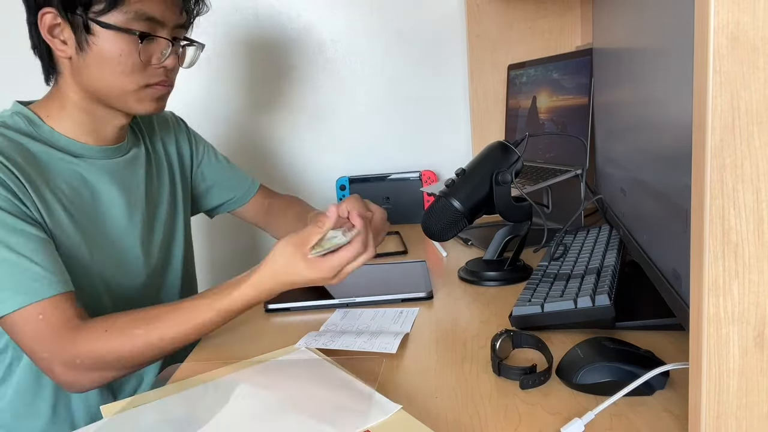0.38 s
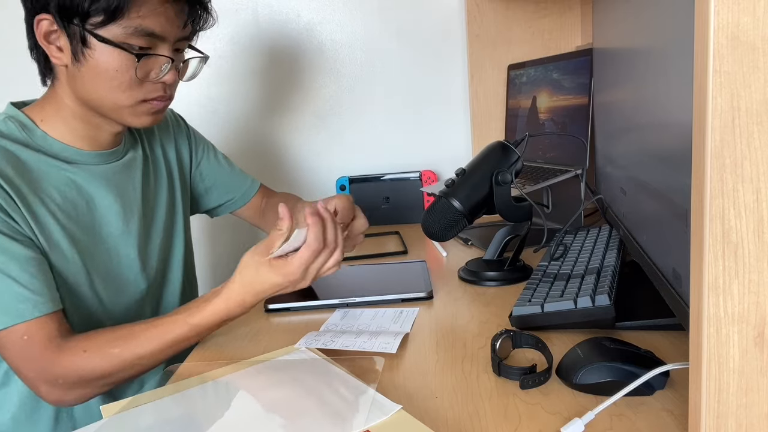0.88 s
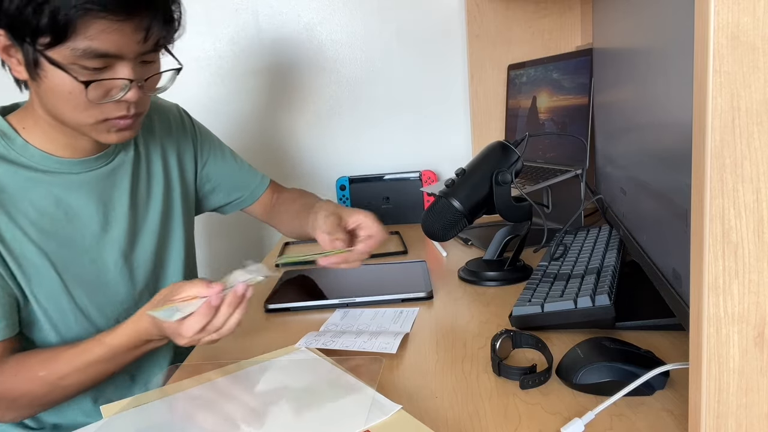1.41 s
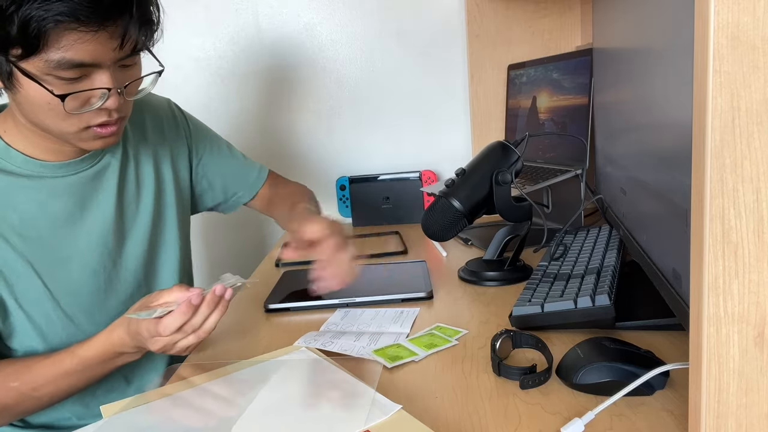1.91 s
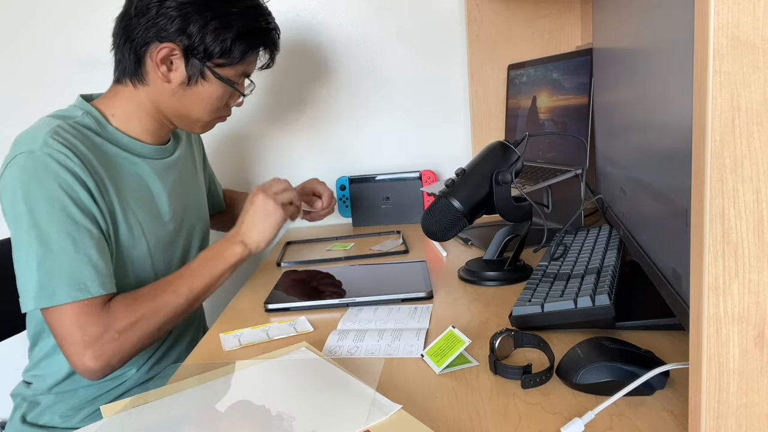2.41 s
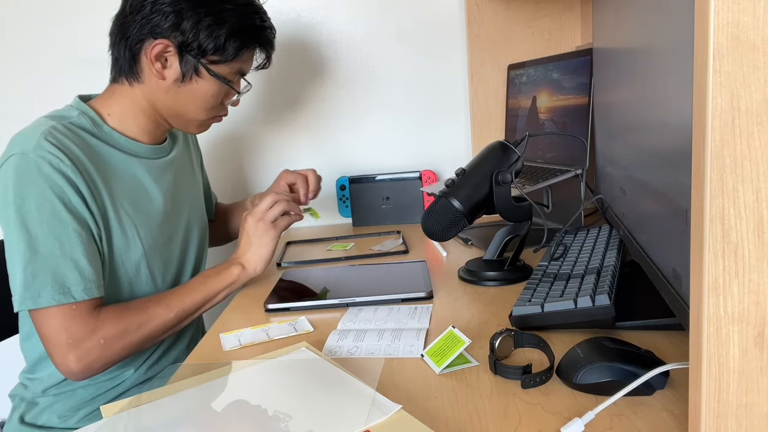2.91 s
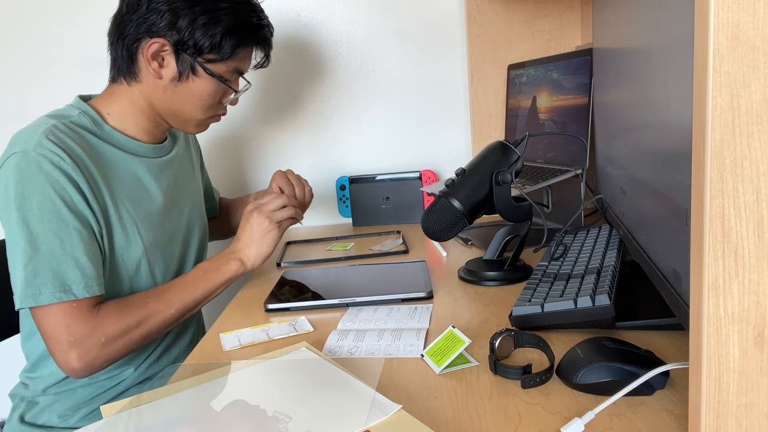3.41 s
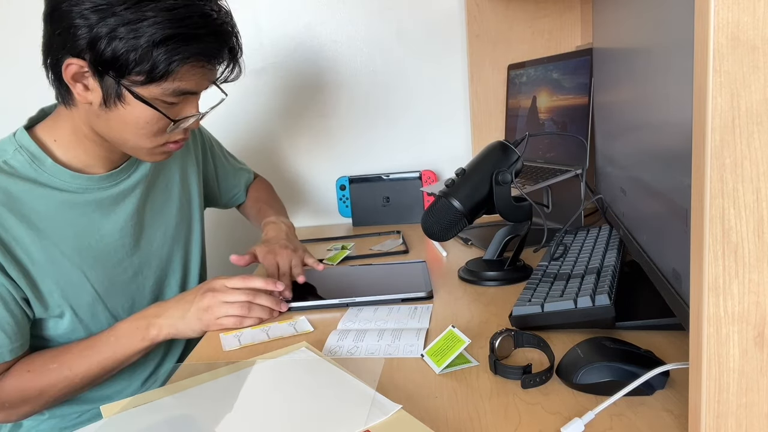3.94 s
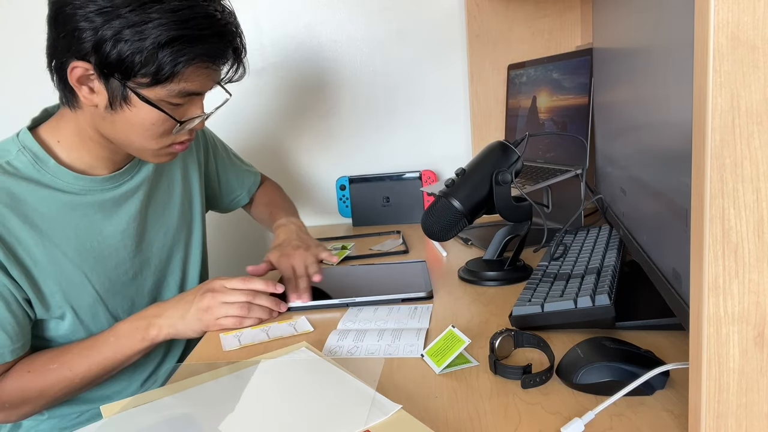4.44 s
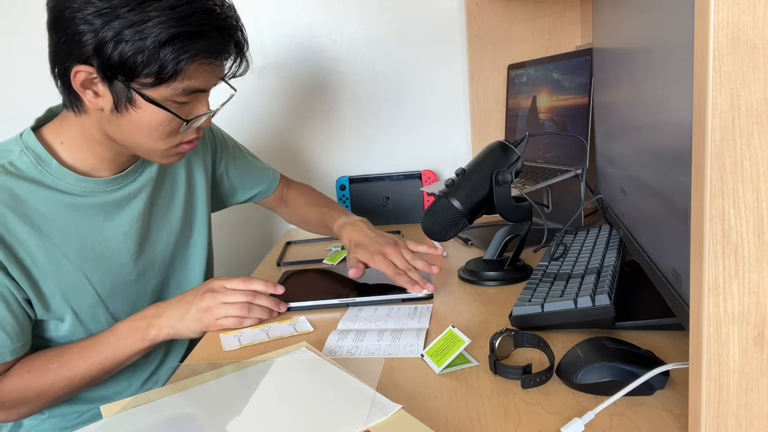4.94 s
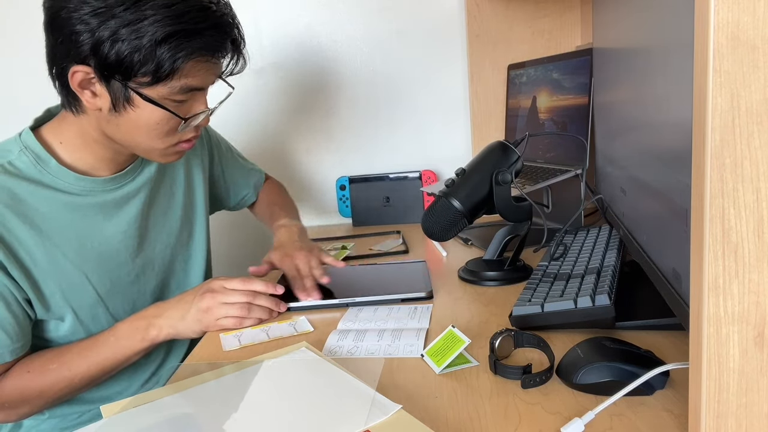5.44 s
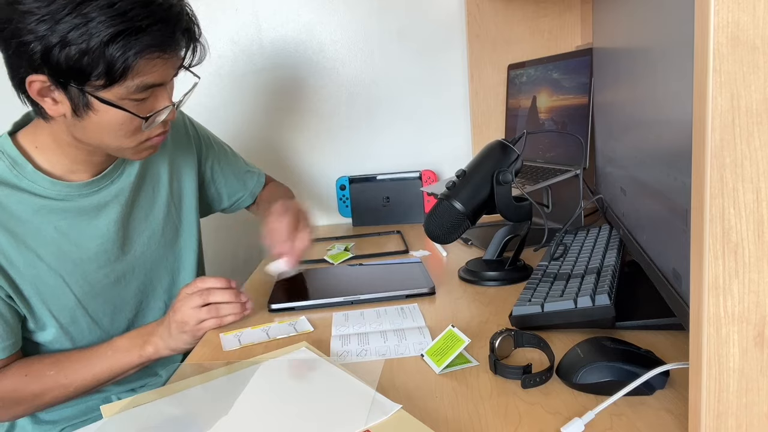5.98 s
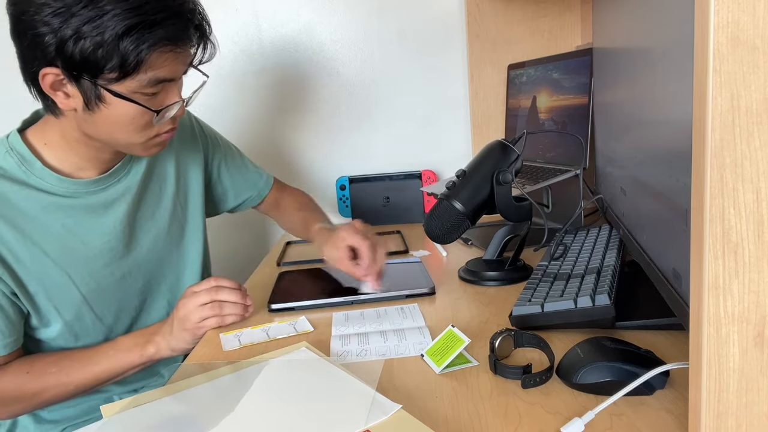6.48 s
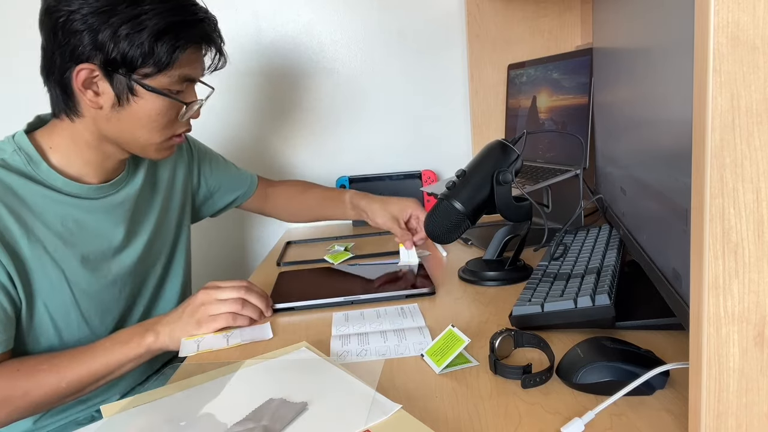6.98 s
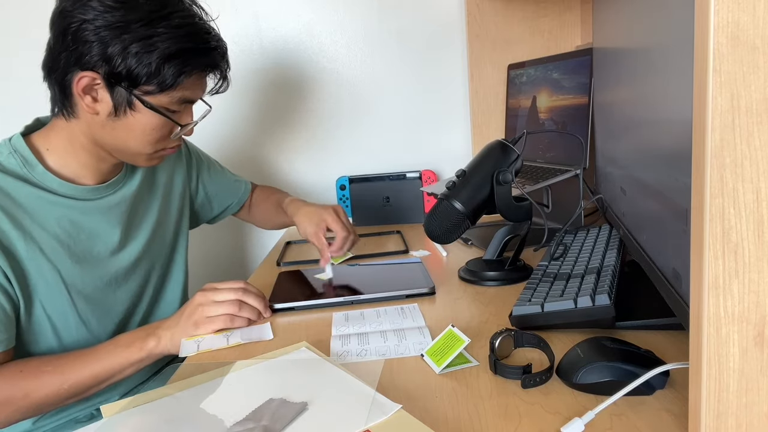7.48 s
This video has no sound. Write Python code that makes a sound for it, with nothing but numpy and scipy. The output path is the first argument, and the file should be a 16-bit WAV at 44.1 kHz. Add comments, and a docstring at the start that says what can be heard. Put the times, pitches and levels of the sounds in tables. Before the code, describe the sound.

A quiet small room with a steady low hum and faint hiss, heard from a microphone standing on a wooden desk. From 0 to 1.4 seconds fingers crinkle a small stiff wrapper: one bright snap near 0.1, scattered crackles, a cluster around 0.8, and a denser run at 1.1-1.3, with short hollow knocks. A softer shuffle and low bump come near 1.75, then a quick crisp rip at 2.2-2.3. Tiny crinkles thin out until 3.8. Near quiet follows, with very faint palm strokes on glass around 4.2-5.3. Cloth rubs from 5.6 to 6.8, with tiny sticky ticks and low desk sways. From 6.9 to 7.55 a sticky strip peels in fierce, dry, high-pitched crack bursts, separated by brief gaps and striking the tablet with low knocks. A dull low thump ends it near 7.6.

```python
"""A wooden desk in a quiet, small, humming room, heard by one microphone standing on the desk.
Hands crinkle and tear a small wrapper: filtered noise snaps over beds of tiny random slips, with hollow
ringing knocks. Palm and cloth wipe a tablet's glass with finer slips and a low drag of noise. A sticky strip
dabs it and peels off in bursts of sharp cracks over fine crackle that stops short; the cracks also strike
the tablet's resonances. Leaning hands and jolts shake the desk: low noise swells and short damped sines."""
import sys
import numpy as np
from scipy import signal
from scipy.fft import rfft, irfft, next_fast_len
from scipy.io import wavfile
from scipy.ndimage import uniform_filter1d

SR = 44100
rng = np.random.default_rng(int(sys.argv[2]) if len(sys.argv) > 2 else 0)


def generate_wav(signal):
    """Clip the signal to [-1, 1] and save it as 16-bit WAV at the path in sys.argv[1]."""
    frames = np.transpose(np.atleast_2d(signal))
    scaled = np.clip(frames, -1, 1) * 32767
    pcm = np.round(scaled).astype(np.int16)
    wavfile.write(sys.argv[1], SR, pcm)


def voltage_ratio(decibels):
    """Convert decibels (scalar or array-like) to amplitude ratios, 20 dB per decade."""
    exponent = np.asarray(decibels, float) / 20
    return 10 ** exponent


N = 335601  # length in samples

# the tablet jolted as the hand lands or the strip jumps free: t/s, level/dB, f/Hz
TABLET_JOLTS = [(1.762, -39, 122.5), (6.247, -39.5, 38), (6.93, -30, 110), (7.0505, -29, 140),
                (7.174, -26.5, 85), (7.319, -21, 80), (7.6068, -16, 170)]
CREST_DB = 7  # a snap's peak over the rms of its first moment


def unit(x):
    """Scales x to rms 1."""
    return x / np.sqrt(np.mean(x ** 2) + 1e-20)


def along(points, hz):
    """Reads a curve of (Hz, value) points on a log frequency axis."""
    f, value = np.transpose(points)
    return np.interp(np.log(hz + 1), np.log(f + 1), value)


def filtered(x, response):
    """Multiplies the spectrum of x by a response of frequency."""
    size = next_fast_len(N + SR // 2)
    return irfft(rfft(x, size) * response(np.fft.rfftfreq(size, 1 / SR)), size)[:N]


def resonance(f, hz, width):
    """Response of one causal damped mode: unity at its centre, width in Hz."""
    return 1j * f * width / (hz * hz - f * f + 1j * f * width)


def hiss(response):
    """Steady coloured noise of rms 1."""
    return unit(filtered(rng.standard_normal(N), response))


def swells(times, hold, db, slopes):
    """Gain of gestures that rise, hold and fall at slopes (up, down) in dB/s; overlaps add in power."""
    t = np.arange(0, N / SR + .002, .001)[:, None]
    rise_db = slopes[0] * np.maximum(times - t, 0)
    fall_db = slopes[1] * np.maximum(t - times - hold, 0)
    gain = np.sqrt(np.sum(voltage_ratio(db - rise_db - fall_db) ** 2, axis=1))
    return np.interp(np.arange(N) / SR, t[:, 0], gain)


def laid(times, rows):
    """Adds short sounds into the scene at their times."""
    at = np.round(times * SR).astype(int)[:, None] + np.arange(rows.shape[1])
    return np.bincount(at.ravel(), rows.ravel(), N + SR)[:N]


def crackle(rate, spread_db, t60, spectrum, patchy_db):
    """Random tiny slips (rate per second) of uneven size and drifting colour, each decaying over t60; rms 1."""
    slips = rng.random(N) < rate / SR
    sizes = slips * voltage_ratio(spread_db * np.minimum(rng.exponential(size=N), 3))
    decay = voltage_ratio(-60 * np.arange(SR // 50) / SR / t60)
    envelope = signal.fftconvolve(sizes, decay)[:N]
    z = signal.stft(envelope * rng.standard_normal(N), nperseg=256)[2]
    # random gains smoothed over frequency and time make the colour drift
    patches = uniform_filter1d(rng.standard_normal(z.shape), size=8, axis=0)
    patches = uniform_filter1d(patches, size=5, axis=1)
    patchy = signal.istft(z * voltage_ratio(patchy_db * unit(patches)), nperseg=256)[1][:N]
    return unit(filtered(patchy, lambda f: voltage_ratio(along(spectrum, f))))


def snaps(times, db, hz, breadth, shiver_db, shiver_t60, modes_db):
    """Each snap: a half-millisecond crack and a shiver of the sheet, in its own band with four chance modes."""
    t = np.arange(2048) / SR
    crack = np.exp(-((t - .0003) / .0003) ** 2)
    shiver = voltage_ratio(shiver_db - 60 * t / shiver_t60)
    burst = rng.standard_normal((len(times), len(t))) * (crack + shiver)
    f = np.fft.rfftfreq(2 * len(t), 1 / SR)
    modes = hz[:, None, None] * np.exp(.5 * rng.standard_normal((len(times), 4, 1)))
    colour = 1 + voltage_ratio(modes_db) * resonance(f, modes, .1 * modes).sum(axis=1)
    band = resonance(f, hz[:, None], breadth * hz[:, None]) ** 2
    burst = irfft(rfft(burst, 2 * len(t)) * band * colour)[:, :len(t)]
    onset_rms = np.sqrt(np.mean(burst[:, :32] ** 2, axis=1))
    return laid(times, burst * (voltage_ratio(db) / onset_rms)[:, None])


def room_hum():
    """The room's steady low hum: noise coloured by the room tone."""
    # room tone: f/Hz, relative level/dB
    room_tone = [(12, -41), (20, -2), (58, -1), (86, -4.5), (118, 1), (152, -9), (192, -10), (224, -18),
                 (252, -15.5), (293, -4.5), (364, -11), (452, -8.5), (500, -18), (841, -24), (1100, -38.5),
                 (1430, -57.5), (2420, -120)]
    return voltage_ratio(-56) * hiss(lambda f: voltage_ratio(along(room_tone, f)))


def wrapper():
    """Creases snap over a bed of small crinkles under squeezing fingers; dense slips make the rip."""
    # creases snapping: t/s, peak level/dB, centre f/Hz
    creases = [(0.0593, -35.5, 4700), (0.0643, -36, 7100), (0.0875, -14, 9640), (0.108, -29, 6700),
               (0.1205, -28.5, 7800), (.1961, -32.5, 9100), (0.207, -36.5, 5960), (.2902, -40, 3130),
               (.3748, -32, 5560), (0.3875, -39, 3930), (0.4066, -28.5, 8200), (.4157, -33, 9000),
               (0.4236, -34, 4670), (0.4306, -28, 8000), (0.519, -39.5, 2900), (.5777, -43, 3640),
               (0.6032, -35, 9500), (0.6153, -35.5, 6930), (0.6604, -27, 6900), (.6821, -54, 6500),
               (0.7138, -34.5, 4440), (0.7345, -30, 6600), (0.7611, -19.5, 8800), (0.773, -40, 6000),
               (0.7941, -20, 6840), (0.817, -34, 5500), (0.8432, -29.5, 3520), (.8649, -20.5, 10900),
               (0.8704, -29, 6340), (0.9824, -36, 2900), (1.0276, -41, 5170), (1.069, -27.5, 7600),
               (1.08, -30, 7940), (1.0876, -21.5, 5900), (1.1185, -15.5, 4630), (1.128, -34, 2470),
               (1.1522, -35, 4000), (1.1645, -27, 5270), (1.1825, -28, 5270), (1.19, -24, 5400),
               (1.2003, -24, 5000), (1.2159, -20, 6250), (1.2265, -36, 3145), (1.2476, -28, 7260),
               (1.2518, -18.5, 6960), (1.2617, -32, 4330), (1.2723, -27, 6100), (1.2896, -32.5, 6800),
               (1.3085, -36.5, 6300), (1.3287, -30.5, 6000), (1.3912, -30.5, 4700), (1.462, -31.5, 11500),
               (1.538, -40.5, 6000), (1.561, -45, 5200), (1.7325, -43, 4770), (1.7526, -36, 3640),
               (1.7577, -37, 3600), (1.7662, -32, 3540), (1.7703, -31, 2940), (1.808, -42, 3580),
               (1.8334, -31.5, 3400), (1.8609, -33, 4550), (2.0077, -34.5, 4260), (2.0462, -34.5, 3960),
               (2.069, -35, 6000), (2.089, -33, 5450), (2.1134, -37, 4030), (2.142, -49, 6000),
               (2.171, -48.5, 4000), (2.2011, -43, 4700), (2.207, -32.5, 5400), (2.232, -27.5, 6600),
               (2.2529, -16, 7500), (2.278, -23, 7100), (2.312, -25, 5000), (2.539, -51, 7000),
               (2.5915, -42, 3360), (2.6853, -34.5, 5400), (2.7655, -41, 8100), (2.8399, -32, 7000),
               (2.8534, -38, 5950), (2.8607, -38, 5800), (2.867, -36.5, 5800), (2.8917, -44, 8000),
               (3.1001, -56, 5300), (3.316, -55, 8100), (3.3205, -42, 8240), (3.5405, -48, 6270),
               (3.6161, -43, 7100), (3.8192, -52.5, 4170)]
    # fingers squeezing: t/s, hold/s, rustle level/dB
    squeezes = [(0.087, 0.038, -57.5), (0.17, 0.11, -57.5), (0.367, 0.063, -53), (0.595, 0.049, -59.5),
                (0.762, 0.055, -55), (0.874, 0.19, -57.5), (1.148, 0.099, -48), (1.298, 0.1, -57.5),
                (1.497, 0.38, -64.5), (1.738, 0.01, -55.5), (1.844, 0.076, -68), (1.996, 0.046, -65.5),
                (2.558, 0.048, -70), (2.685, 0.087, -69.5), (2.854, 0.013, -60), (3.022, 0.023, -67),
                (3.1, .18, -71.5), (3.307, 0.036, -65.5), (3.447, 0.018, -73), (3.543, .1, -68),
                (3.733, 0.02, -74.5)]
    # wrapper ripped open: t/s, hold/s, level/dB
    rips = [(2.2, .02, -50.5), (2.23, 0.016, -39.5), (2.252, 0.014, -32), (2.277, 0.015, -33.5),
            (2.301, 0.01, -34.5)]
    # colour of the crinkles: f/Hz, relative level/dB
    foil_colour = [(290, -36.5), (500, -3), (1110, -3.5), (1770, -3), (2160, -3), (3650, -2), (4210, -10.5),
                   (5310, -4.5), (8210, -5.5), (13300, -8), (16000, -23.5)]
    # colour of the rip: f/Hz, relative level/dB
    rip_colour = [(290, -36.5), (500, -20.5), (570, -12), (1050, -18), (2460, -8.5), (2890, -13.5),
                  (8090, -4.5), (13300, -16.5), (16000, -10.5)]

    s, db, hz = np.transpose(creases)
    snapping = snaps(s, db - CREST_DB, hz, 1.5, shiver_db=-8, shiver_t60=0.021, modes_db=-6.0)
    # once more off the desk below the hands, 2.4 ms later
    snapping += voltage_ratio(-7.5) * np.pad(snapping, (round(0.0024 * SR), 0))[:N]

    rustle = swells(*np.transpose(squeezes), (399.5, 247.5))
    rustle += swells(s, 0, db - 28.5, (5000, 500.5))  # crinkles die away after each crease
    bed = crackle(2600, 5.0, 0.005, foil_colour, patchy_db=5.0)

    s, hold, db = np.transpose(rips)
    tearing = swells(s, hold, db, (1500, 699.5))
    tearing += swells(s + hold, 0, db - 16.5, (5000, 150.5))  # the torn ends go on moving
    rip = crackle(3000, 2.2, .005, rip_colour, patchy_db=2.5)
    return snapping + rustle * bed + tearing * rip


def walls(x):
    """Desk, screen and walls answer with decaying noise tails; every third of a second meets a new tail."""
    # decay of the reflections: f/Hz, t60/s
    wall_decay = [(300, 0.086), (2000, 0.22), (7000, 0.11), (15000, 0.1)]
    out, step = np.zeros(N + SR), SR // 3
    for start in range(0, N, step):
        hz, t, z = signal.stft(rng.standard_normal(SR // 2), SR, nperseg=256)
        decay = voltage_ratio(-60 * t / along(wall_decay, hz)[:, None])
        tail = signal.istft(z * decay, SR, nperseg=256)[1]
        wet = signal.fftconvolve(x[start:start + step], tail / np.linalg.norm(tail))
        out[start + 100:][:len(wet)] += wet  # 100 samples of pre-delay
    return out[:N]


def pouch():
    """The pouch, knocked or flexed, rings hollow: a damped tone and a faint overtone, roughened by noise."""
    # knocks: t/s, level/dB, f/Hz
    knocks = [(0.203, -54, 455), (0.288, -43.5, 550), (0.387, -30, 526), (0.419, -34, 1013),
              (0.751, -41, 1170), (0.794, -30, 1750), (0.872, -35, 888), (0.947, -41.5, 2014),
              (1.117, -22.5, 1777), (1.129, -38, 1825), (1.191, -32.5, 1680), (1.214, -30.5, 2100),
              (1.388, -39.5, 800), (1.753, -37, 455), (1.763, -38.5, 1940), (1.819, -45, 1805),
              (2.044, -46, 465), (2.066, -40.5, 1870), (2.114, -48.5, 1620), (4.574, -46, 457),
              (6.433, -45, 616)]
    s, db, hz = np.transpose(knocks)[:, :, None]
    t = np.arange(SR // 10) / SR
    grain = rng.standard_normal((len(s), len(t)))
    rough = 1 + .9 * uniform_filter1d(grain, size=40, axis=1) * np.sqrt(40)
    ring = np.sin(2 * np.pi * hz * t) + 0.14 * np.sin(2 * np.pi * 1.46 * hz * t)
    envelope = voltage_ratio(db - 4.5 - 60 * t / 0.047) * (1 - np.exp(-t / .0004))
    return laid(s[:, 0], envelope * rough * ring)


def desk():
    """The top sways and thuds as low resonant noise, straight into the microphone's foot."""
    # the hand leaning on the desk: t/s, hold/s, sway level/dB
    leans = [(1.775, 0.046, -50), (5.647, 0.011, -45), (5.828, .05, -43.5), (6.27, .05, -44.5),
             (6.457, 0.14, -47.5), (6.725, 0.023, -43), (6.92, 0.23, -54), (7.206, .03, -37),
             (7.393, 0.065, -40.5), (7.514, 0.022, -53)]
    sway = swells(*np.transpose(leans), (179, 105.5))
    s, db, _ = np.transpose(TABLET_JOLTS)
    thud = voltage_ratio(-15) * sway + swells(s, 0, db - 14.5, (349.5, 308))
    rocking = hiss(lambda f: resonance(f, 41, 15) ** 2)
    thudding = hiss(lambda f: resonance(f, 100, 90) ** 2)
    return sway * rocking + thud * thudding


def jolts():
    """The jolted tablet swings and rebounds: a sine losing 13.2 dB a swing, gone within a few swings."""
    s, db, hz = np.transpose(TABLET_JOLTS)[:, :, None]
    swings = hz * np.arange(SR // 5) / SR
    return laid(s[:, 0], -voltage_ratio(db - 13.2 * swings) * np.sin(2 * np.pi * swings))


def wiping():
    """Fine slips make the palm hiss with a high sheen, then the cloth; skin drags lowest, as broad noise."""
    # strokes of the palm: t/s, hold/s, hiss level/dB, skin drag level/dB
    palm_strokes = [(4.244, 0.023, -93, -74), (4.508, 0.09, -70, -69), (4.63, 0.19, -72, -85),
                    (5.153, 0.2, -72.5, -83)]
    # strokes of the cloth: t/s, hold/s, hiss level/dB, skin drag level/dB
    cloth_strokes = [(5.599, 0.083, -66.5, -78), (5.69, 0.094, -72.5, -82), (6.27, 0.12, -78.5, -75.5),
                     (6.43, 0.28, -81, -76), (6.79, 0.054, -73.5, -77)]
    # colour of the palm: f/Hz, relative level/dB
    palm_colour = [(2060, -41.5), (3500, -8), (7180, -4), (11600, -8.5), (14800, -3), (16000, -5)]
    # colour of the cloth: f/Hz, relative level/dB
    cloth_colour = [(1760, -45), (3000, -20), (4600, -18.5), (5960, -10), (13600, -17), (16000, -32)]
    palm_slopes, cloth_slopes = (153, 100), (701, 400)  # rise and fall in dB/s

    s, hold, hiss_db, drag_db = np.transpose(palm_strokes)
    palm = crackle(6000, 1.5, 0.012, palm_colour, patchy_db=-0.5)
    rub = swells(s, hold, hiss_db, palm_slopes) * palm
    drag = swells(s, hold, drag_db, palm_slopes)

    s, hold, hiss_db, drag_db = np.transpose(cloth_strokes)
    cloth = crackle(6000, 1.7, 0.0051, cloth_colour, patchy_db=1.2)
    rub += swells(s, hold, hiss_db, cloth_slopes) * cloth
    drag += swells(s, hold, drag_db, cloth_slopes)
    return rub + drag * hiss(lambda f: resonance(f, 870, 1700) ** 2)


def strip():
    """The sticky strip ticks on, then cracks off; each crack bites the glass and knocks the tablet's modes."""
    # strip touching down lightly: t/s, peak level/dB
    dabs = [(5.5935, -51), (5.6252, -68), (6.4241, -54.5), (6.4344, -54), (6.4466, -54), (6.4536, -48.5),
            (6.462, -54), (6.4757, -59), (6.481, -47), (6.485, -44.5), (6.5191, -50.5), (6.549, -40.5),
            (6.601, -45.5), (6.6043, -49.5), (6.6316, -51), (6.7118, -53.5)]
    # glue letting go of the glass: t/s, peak level/dB, centre f/Hz
    peels = [(6.8918, -41, 6500), (6.8976, -21, 4100), (6.9166, -12.5, 5400), (6.9268, -9.5, 6460),
             (6.9375, -38, 4770), (6.9446, -17, 5100), (6.9744, -48, 2780), (7.0037, -15, 8200),
             (7.0086, -15.5, 7500), (7.0239, -8.5, 6060), (7.0331, -21, 8160), (7.0389, -16, 9400),
             (7.0504, -25.5, 7150), (7.0533, -12.5, 7560), (7.0565, -16, 10800), (7.0806, -46, 7500),
             (7.0865, -44, 8300), (7.1021, -31, 5830), (7.1082, -19, 6200), (7.113, -24, 7360),
             (7.1171, -13.5, 7400), (7.1235, -19.5, 4160), (7.136, -24, 8500), (7.1418, -14, 8200),
             (7.1532, -21.5, 5940), (7.1713, -17, 7300), (7.2309, -54, 5400), (7.2448, -14.5, 8250),
             (7.2583, -16, 7700), (7.2638, -15.5, 7900), (7.27, -10, 8620), (7.2801, -12.5, 7560),
             (7.285, -17, 7140), (7.2891, -10, 6800), (7.2964, -23, 9100), (7.3047, -13.5, 8000),
             (7.3099, -16.5, 7200), (7.315, -10.5, 6340), (7.3913, -45.5, 3000), (7.465, -17, 4140),
             (7.47, -17, 6360), (7.4745, -13, 8000), (7.4807, -14.5, 4970), (7.4837, -11, 6300),
             (7.487, -9, 6330), (7.492, -14.5, 5960), (7.5, -17.5, 4970), (7.5067, -15.5, 8700),
             (7.5118, -12.5, 6900), (7.5198, -15, 9300), (7.5238, -16.5, 6500), (7.5326, -17.5, 7300),
             (7.5897, -30, 2700)]
    # stretches of cracking: t/s, length/s, level of the fine crackle held beneath, then stopping short/dB,
    # knock strength/dB
    stretches = [(6.913, 0.11, -55.5, -4), (7.0, 0.052, -56, 11), (7.08, .03, -68, 8),
                 (7.104, 0.058, -41.5, 19), (7.204, .04, -76, 8), (7.241, 0.14, -52.5, 18),
                 (7.409, .06, -68.5, 8), (7.466, 0.079, -42.5, 11.5), (7.6, .02, -66, 19)]
    # colour of the fine crackle: f/Hz, relative level/dB
    fine_colour = [(710, -39), (1200, 4), (1770, -2), (2020, 2.5), (4550, -5), (8530, 3), (9510, -3),
                   (14700, -0.5), (16000, -20)]
    # modes of the tablet lying on the desk: f/Hz, width/Hz, level/dB
    tablet_modes = [(95, 40, -11), (170, 166, 8), (227, 167, 9.5), (406, 134, 3.5), (785, 125, 4),
                    (956, 400, -3)]

    s, db = np.transpose(dabs)
    dab_hz = np.full(len(s), 4300.)
    ticks = snaps(s, db - CREST_DB, dab_hz, 1.7, shiver_db=-12, shiver_t60=.02, modes_db=-9)

    s, db, hz = np.transpose(peels)
    cracks = snaps(s, db - CREST_DB, hz, 2.4, shiver_db=-11, shiver_t60=.02, modes_db=6)
    bite_db = db - 11 - 13.5 * np.log2(hz / 6500)  # duller cracks bite the glass harder
    bite_hz = np.full(len(s), 2600.)
    cracks += snaps(s, bite_db - CREST_DB, bite_hz, 1.4, shiver_db=-9, shiver_t60=.025, modes_db=5)

    start, length, fine_db, strength_db = np.transpose(stretches)
    stretch = np.searchsorted(start, s + .008) - 1  # the stretch each crack belongs to
    # knocks grow through a stretch: 91 dB/s about its middle
    middle = start[stretch] + length[stretch] / 2
    knock_db = db + strength_db[stretch] + 91 * (s - middle)
    signs = rng.choice([-1, 1], len(s))
    blows = np.bincount(np.round(s * SR).astype(int), signs * voltage_ratio(knock_db), N)

    def tablet_body(f):
        """Sums the tablet's modes with alternating sign."""
        return sum((-1) ** k * voltage_ratio(mode_db) * resonance(f, centre, width)
                   for k, (centre, width, mode_db) in enumerate(tablet_modes))

    held = swells(start, length, fine_db, (2000, 3000))  # steep slopes: each stretch stops short
    fine = held * crackle(5000, 2, .004, fine_colour, patchy_db=2)
    return ticks + cracks + filtered(blows, tablet_body) + fine


def scene():
    """Sums near sounds, their echo, the desk and the room's hum, alike on two channels."""
    raised = wrapper() + pouch()
    on_glass = wiping() + strip()
    echo = walls(voltage_ratio(-10) * raised + voltage_ratio(-16.5) * on_glass)  # the glass lies close to the microphone: drier
    mono = raised + on_glass + echo + desk() + jolts() + room_hum()
    return np.tile(mono, (2, 1))


def band_limit(x):
    """A steep low-pass at the top of the band."""
    return signal.sosfilt(signal.butter(12, 17000, fs=SR, output="sos"), x)


def record(dry):
    """One microphone on both channels: its own hiss, soft clipping of the loudest cracks, a band limit."""
    # colour of the microphone's hiss: f/Hz, relative level/dB
    mic_colour = [(530, -34), (900, -6.5), (1420, -18.5), (1660, -17), (2540, -22.5), (16000, -27)]
    mono = dry[0] + voltage_ratio(-76) * hiss(lambda f: voltage_ratio(along(mic_colour, f)))
    mono = mono / (1 + np.abs(mono / .34) ** 3) ** (1 / 3)  # bends towards a ceiling of 0.34
    mono = filtered(mono, lambda f: np.clip((16200 - f) / 500, 0, 1))  # fades out from 15.7 to 16.2 kHz
    return band_limit(np.tile(mono, (2, 1)))


dry = scene()
out = record(dry)
generate_wav(out)
```